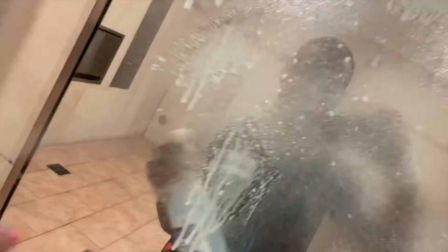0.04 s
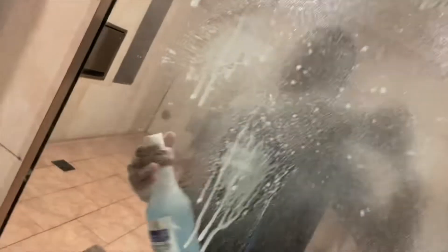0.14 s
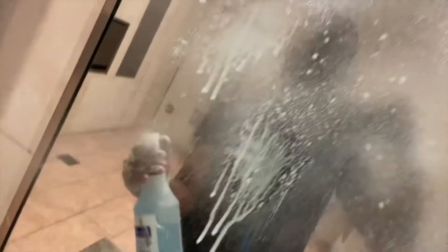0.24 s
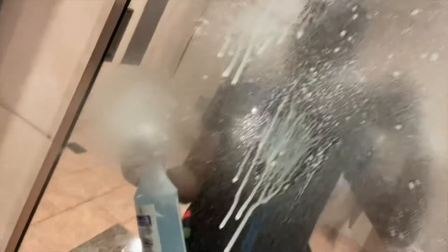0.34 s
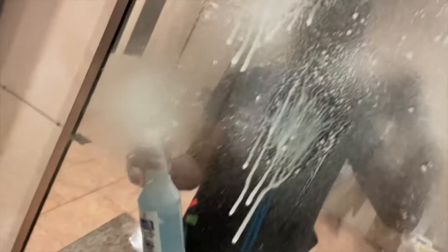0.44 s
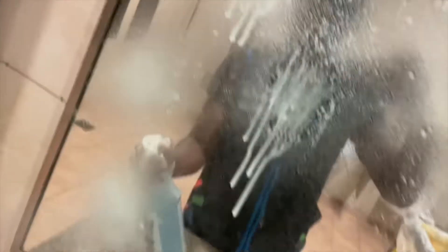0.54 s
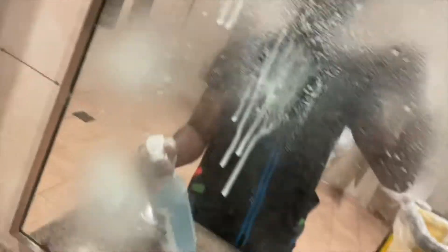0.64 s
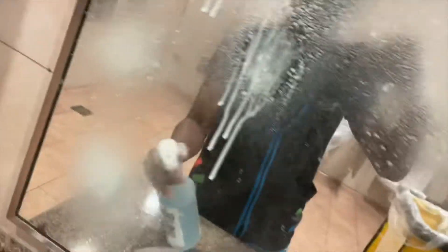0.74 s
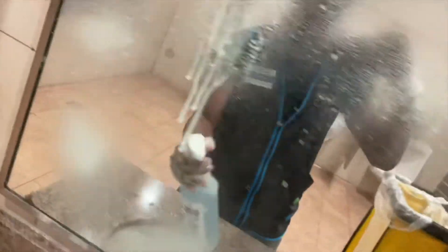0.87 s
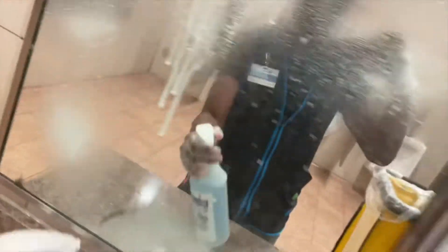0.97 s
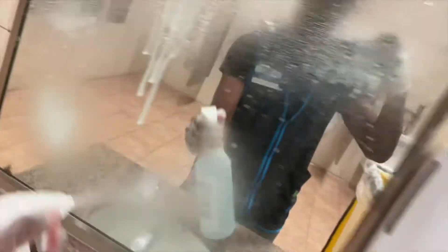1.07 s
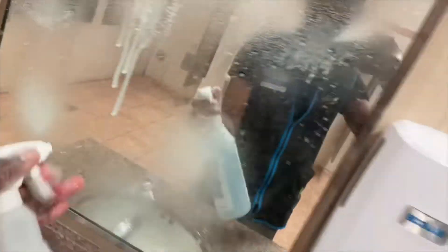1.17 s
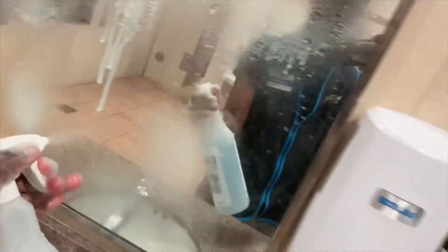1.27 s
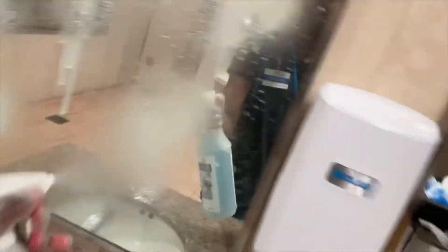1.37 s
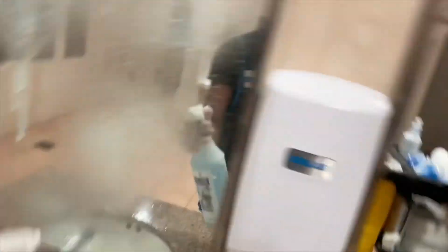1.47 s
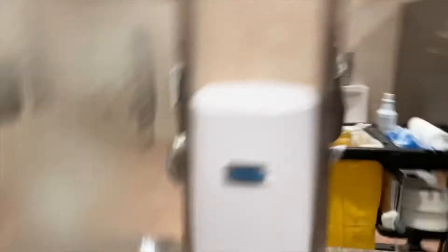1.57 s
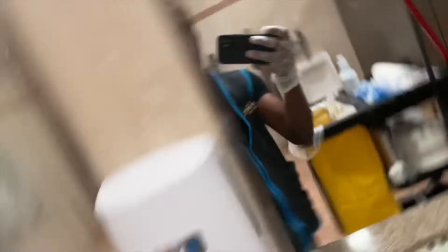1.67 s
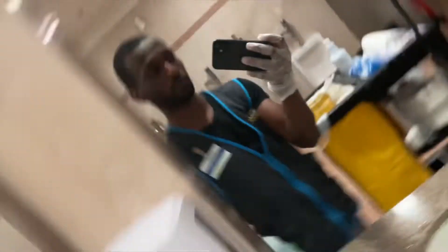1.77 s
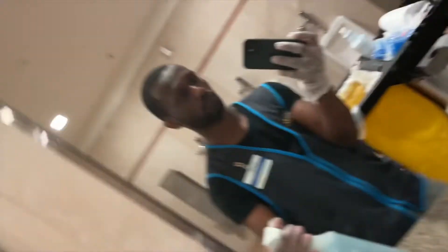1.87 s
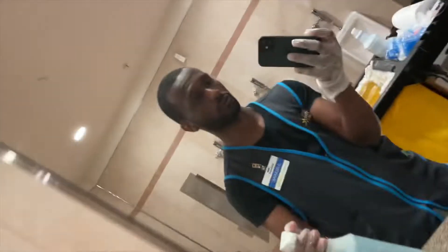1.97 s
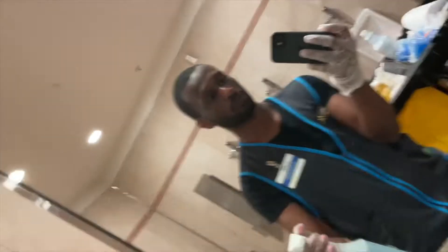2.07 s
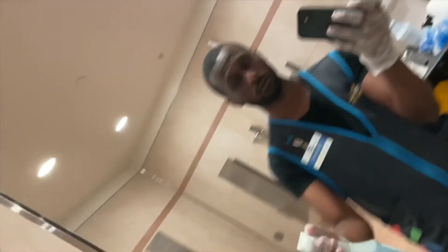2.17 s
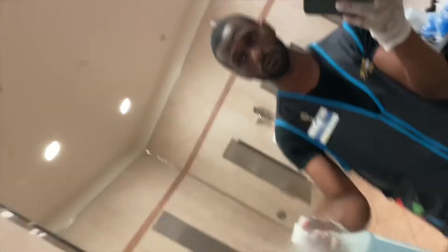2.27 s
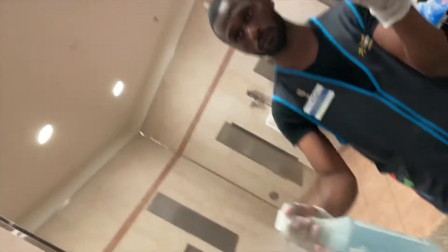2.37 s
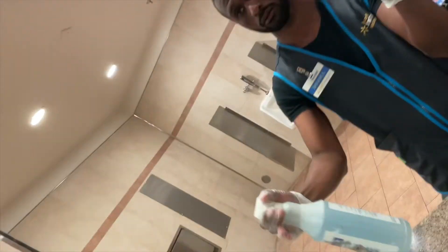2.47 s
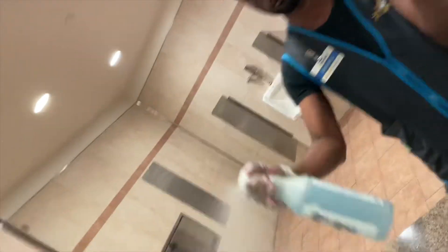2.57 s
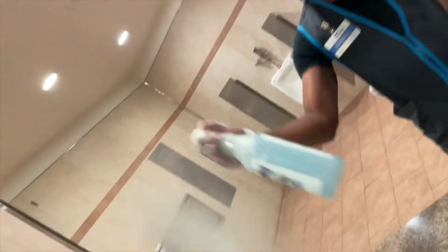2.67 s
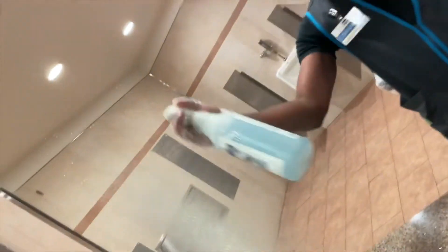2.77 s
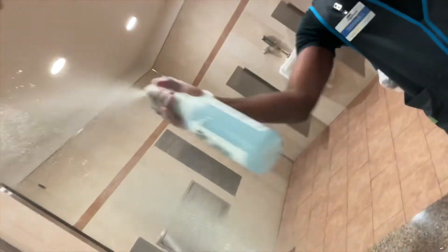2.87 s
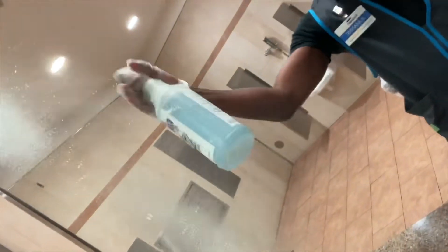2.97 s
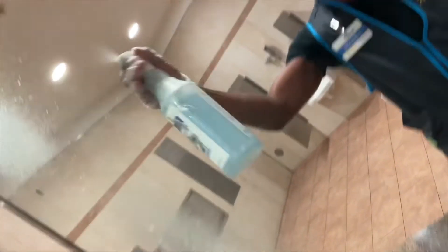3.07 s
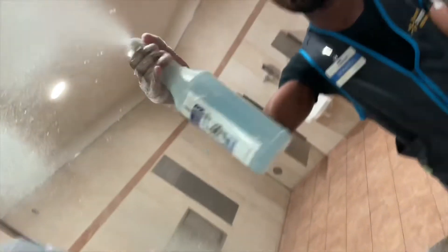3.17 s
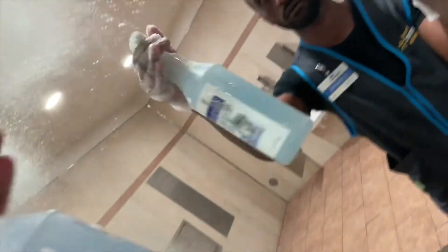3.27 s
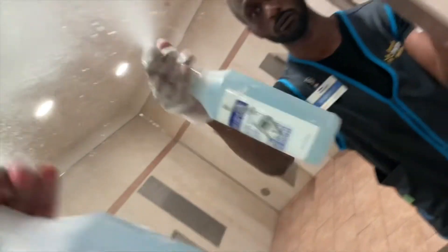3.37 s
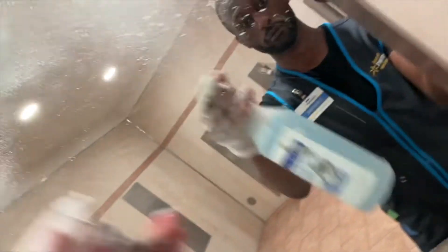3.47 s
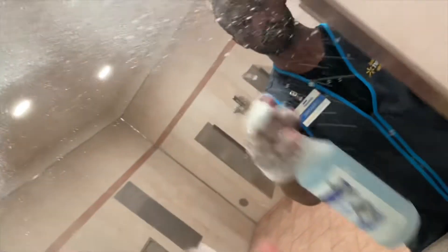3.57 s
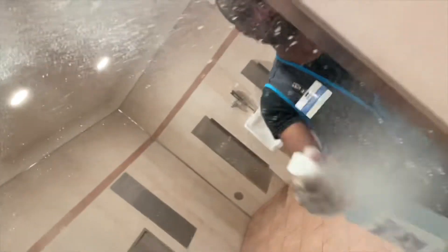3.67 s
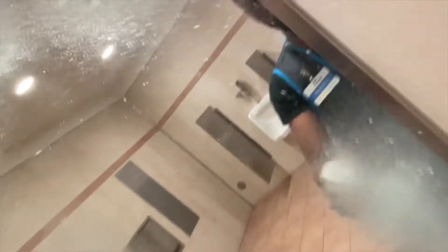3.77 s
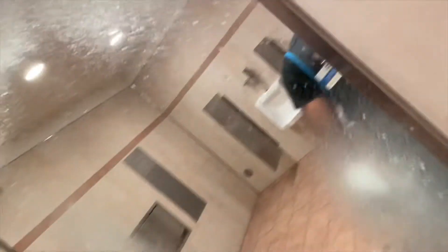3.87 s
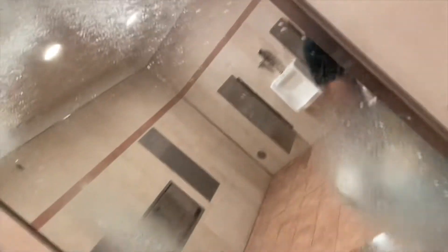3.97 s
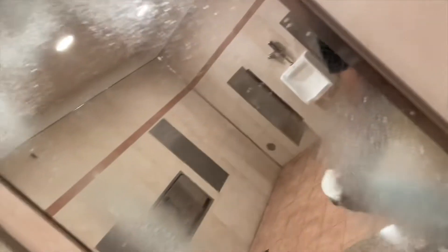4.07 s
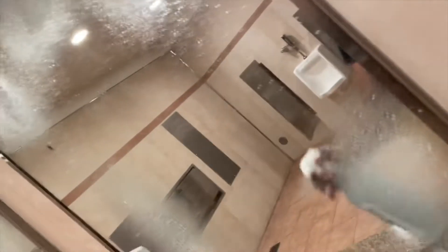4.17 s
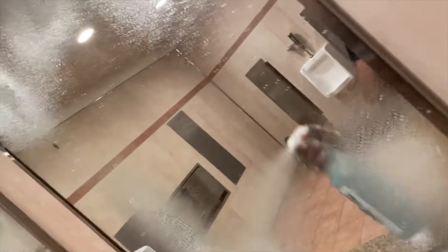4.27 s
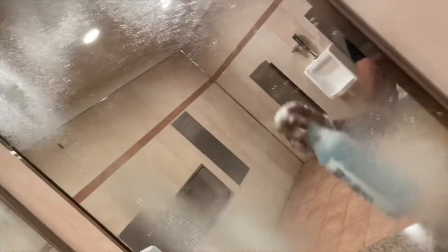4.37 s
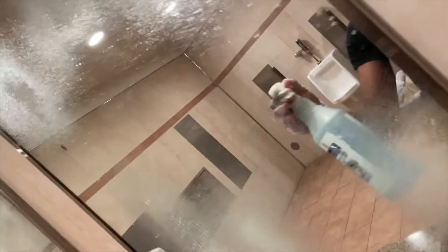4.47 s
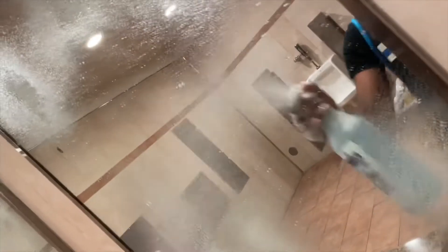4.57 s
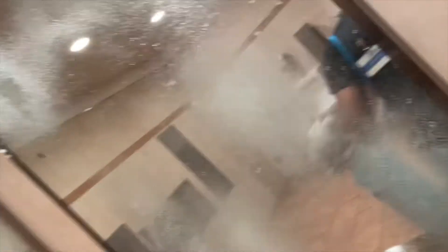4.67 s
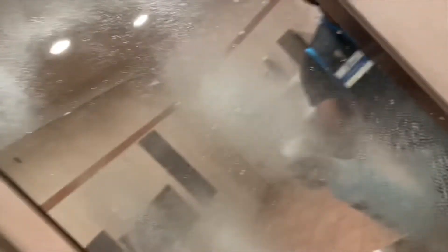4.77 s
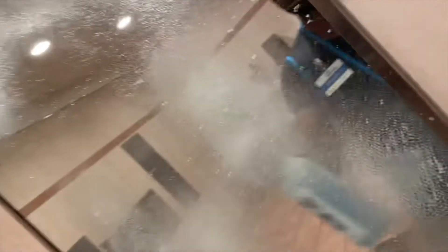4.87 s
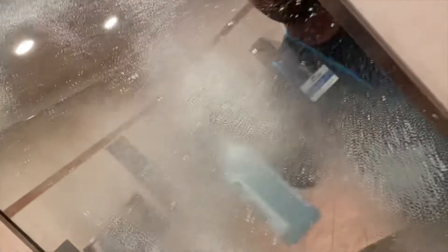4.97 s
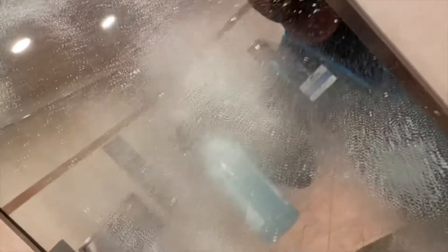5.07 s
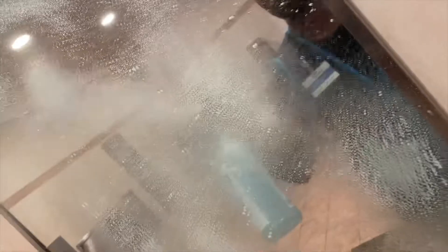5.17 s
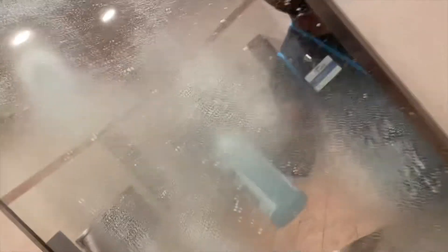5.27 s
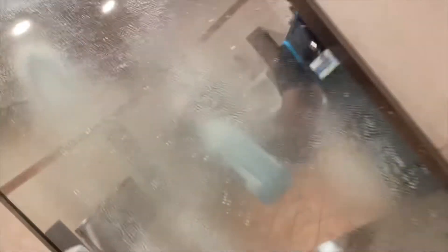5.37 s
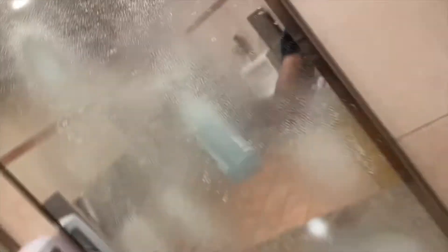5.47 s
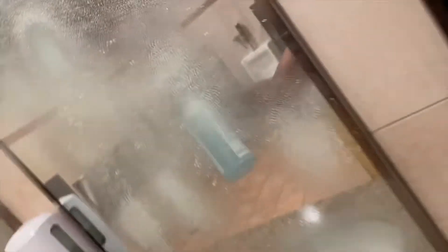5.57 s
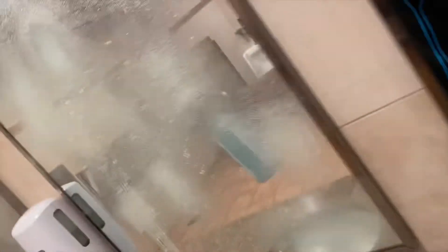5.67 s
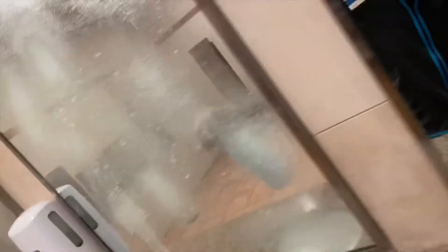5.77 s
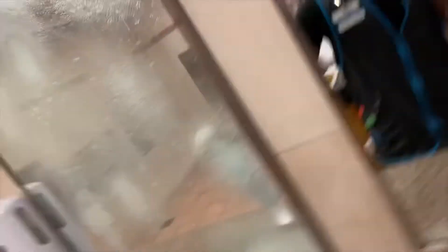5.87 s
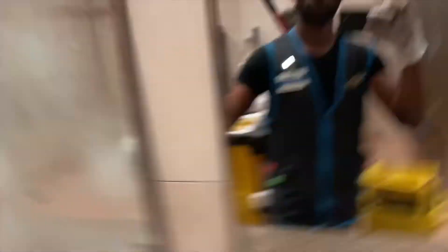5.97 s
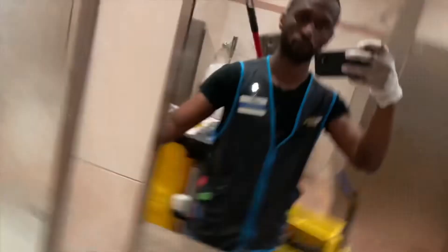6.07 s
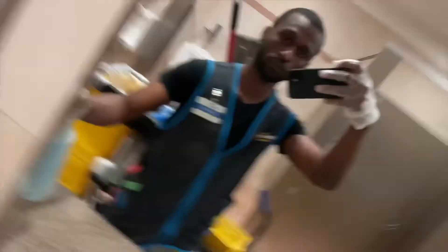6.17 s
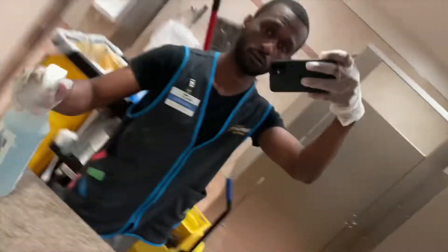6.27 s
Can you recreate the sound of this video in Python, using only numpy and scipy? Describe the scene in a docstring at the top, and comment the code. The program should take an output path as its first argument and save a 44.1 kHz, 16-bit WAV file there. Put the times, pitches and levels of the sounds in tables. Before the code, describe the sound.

A plastic trigger bottle is pumped quickly close to the microphone: each squeeze spits coarse drops, blooms into fine high mist and sputters shut, its head ringing hollowly. Low bumps come early. After six squirts there is a gap of rubbing cloth, then a steadier run to the end, with dry clicks and knocks between squeezes, short bright tile echoes, faint fan tones and handling rumble.

```python
"""A wet hiss of spray comes first, with low thuds close behind as the hand bumps the camera. A trigger bottle
squirts cleaner at a mirror in a tiled restroom, in two quick runs: each squeeze builds pressure, so shaped
noise spits, opens into fine bright mist and sputters shut, and the plastic head rings. Short ringing ticks come
from the trigger, swelling noise is the rustle of glove and sleeve, and a faint whistle and squeak are heard.
Below lie a low noise rumble, soft room air and a fan's steady tones."""
import sys
import numpy as np
from scipy import signal
from scipy.fft import rfft, irfft, next_fast_len
from scipy.io import wavfile
from scipy.ndimage import uniform_filter1d, map_coordinates

SR = 44100
rng = np.random.default_rng(int(sys.argv[2]) if len(sys.argv) > 2 else 0)


def wav_record(signal):
    """Record a signal, one row per channel, as 16-bit PCM in the file named by sys.argv[1]."""
    frames = np.transpose(np.atleast_2d(signal))
    bounded = np.clip(frames, -1, 1)
    # unit amplitude maps onto the largest positive 16-bit level
    quanta = np.round(bounded * 32767).astype(np.int16)
    wavfile.write(sys.argv[1], SR, quanta)


N = 279153
T = np.arange(N) / SR
HZ = np.fft.rfftfreq(N, 1 / SR)

# One squeeze per row: start t/s, push length t/s, level/dB, brightness level/dB, head ring level/dB,
# head ring f/Hz, nozzle whistle level/dB, opening t/s, change through the push level/dB, run-out t/s
SQUIRTS = [(0, .052, -30.5, -3.5, -14.5, 1060, -18, .002, 1, 0.021),
           (0.167, .12, -31, -4.5, -16.5, 1030, -40, .006, -1.5, 0.026),
           (.431, .14, -28, -0.5, -21.5, 1102, -26, .005, 0, .028),
           (.711, 0.13, -29.5, -1, -22.5, 1073, -18.5, .008, -3, 0.029),
           (.965, 0.14, -30, 0, -22.5, 1013, -20.5, .007, -3.5, 0.026),
           (1.235, .14, -32, -3, -21.5, 1013, -17, .009, -4, 0.026),
           (2.153, .16, -30, -1.5, -17, 1075, -21.5, .01, -.5, 0.034),
           (2.473, .14, -31, -1.2, -16.5, 1067, -29, .006, 1.5, 0.019),
           (2.757, .15, -31.5, -1, -20, 1132, -23, .004, -1, 0.026),
           (3.032, .14, -30, -1.7, -20, 1150, -27, .005, 0, 0.031),
           (3.291, 0.11, -29, -2.5, -21.5, 1175, -18, .006, 3.5, 0.036),
           (3.577, .14, -28, -3, -20.5, 1152, -19.5, .005, -1, .031),
           (3.87, .15, -29, -.5, -20.5, 1154, -20, .005, 0.5, 0.02),
           (4.153, .15, -30, -1, -19, 1090, -26, .008, -1.5, 0.022),
           (4.462, 0.15, -30, -2, -18, 1025, -18, .008, 2.5, 0.033),
           (4.775, .13, -30.5, -2, -14, 1054, -24, .008, -1, 0.022),
           (5.07, .16, -32.5, -3.5, -15.5, 1035, -28, .004, -0.5, 0.021),
           (5.412, 0.2, -33.5, -4, -19.5, 1086, -24, .008, 0, 0.024),
           (5.795, .18, -33, -1.5, -19.5, 1076, -29, .006, 0.5, 0.026),
           (6.201, 0.23, -28.5, 1.5, -25, 1057, -21.5, .003, 5.5, 0.023)]
# Colour of the coarse drops, present at any pressure: f/Hz, relative level/dB per Hz
COARSE_COLOUR = [(300, -49), (1700, -18), (2300, -12.5), (2900, -5.5), (3600, -3.5), (4700, -0.5),
                 (6200, 3), (8500, 8.5), (10500, 7), (13000, 4), (16000, -17)]
# Colour of the fine mist, heard near full pressure: f/Hz, relative level/dB per Hz
MIST_COLOUR = [(2000, -40), (5000, -19), (7000, -12.5), (9000, -9.5), (11000, -7.5), (13000, -3.3),
               (14800, -1), (15700, 1)]


def spray():
    """Each squeeze drives coarse spit, then mist, then spit again; the flow also rings the nozzle head."""
    out, t = np.zeros((2, N)), T[:SR // 3]
    coarse, fine = noise(COARSE_COLOUR), noise(MIST_COLOUR)
    for start, push, db, bright_db, ring_db, ring_hz, whistle_db, opening, swell_db, run_out in SQUIRTS:
        now = (round(start * SR) + np.arange(len(t))) % N
        p = pressure(t, push, opening, run_out)
        effort = amp(db + swell_db * (np.minimum(t / push, 1) - .5))
        hiss = jet(t, p, push, bright_db, coarse[:, now], fine[:, now])
        head = nozzle_head(t, p, ring_db, ring_hz, whistle_db)
        add(out, start, effort * (near_echoes(hiss) + head))
    # the jet tears unevenly into drops
    drops = unit(amp(1.3 * flutter(per_s=2200)))
    return uneven_colour(out) * drops


def pressure(t, push, rise, run_out, shut_s=0.0023):
    """The valve opens, pressure holds, sags as the piston stops, and the valve shuts."""
    opening = np.minimum(t / rise, 1)
    # a softened corner: nearly no sag until just before the push ends, then a steady fade
    past_push = np.logaddexp(0, (t - push + 0.013) / 0.0041)
    sagging = np.exp(-past_push * 0.011 / 0.072)
    shutting = np.exp(-np.maximum(t - push - run_out, 0) / shut_s)
    return opening * sagging * shutting


def jet(t, p, push, bright_db, coarse, fine):
    """High pressure breaks liquid into fine mist; low pressure leaves coarse drops and an unbroken jet."""
    bloom_s, breakup_share = .016, 0.56
    atomised = p ** 3 * (1 - np.exp(-t / bloom_s))
    spit = amp(-4 - bright_db) * p * (1 - breakup_share * atomised) * coarse
    mist = amp(1.5 + 0.28 * bright_db) * atomised * fine
    # the unbroken jet hisses higher the faster it runs: a chirp up at the start, down at the end
    slow_hz, fast_hz = 6000, 12500
    chirp = gliding_band(slow_hz + (fast_hz - slow_hz) * atomised, width_hz=1030)
    spurt_db = np.where(t < push / 2, -7, -9)
    spurt = amp(spurt_db) * p * (1 - atomised) * chirp
    # the hollow cone of mist hisses in a broad band that sinks by 13000 Hz per second
    cone = amp(-14.5) * atomised * gliding_band(11530 - 13000 * t, width_hz=3000)
    return spit + mist + cone + spurt


def nozzle_head(t, p, ring_db, ring_hz, whistle_db):
    """Rushing liquid makes the plastic head ring at several pitches and the nozzle whistle."""
    flow = rng.standard_normal((2, len(t)))
    main_ring = unit(resonate(flow, ring_hz, width_hz=243))
    second_mode = amp(-10) * gliding_band(np.full(len(t), 1.28 * ring_hz), width_hz=220)
    overtone = amp(-12) * unit(resonate(flow, 2 * ring_hz, width_hz=400))
    ring = amp(ring_db - 1) * (main_ring + second_mode + overtone)
    whistle = amp(whistle_db) * unit(resonate(flow, 3900, width_hz=490))
    build_up = 1 - np.exp(-t / 0.014)
    return (ring + whistle) * p * build_up


# Hand, bottle and mirror throw the hiss back: typical delay t/s, gain (plain factor)
NEAR_ECHOES = [(.0008, .42), (.0015, .36), (.0026, .34), (.0041, .28)]


def near_echoes(x):
    """Short echoes comb the hiss; longer paths slide the comb down as the bottle sweeps along the glass."""
    t, out = T[:x.shape[1]], x.copy()
    for delay, gain in NEAR_ECHOES:
        stretch = 1 + rng.uniform(.1, .7) * t
        path = delay * rng.uniform(.85, 1.2) * stretch
        at = np.maximum((t - path) * SR, 0)
        out += gain * np.array([map_coordinates(side, [at], order=3) for side in x])
    return out


def uneven_colour(x, patchy_db=3.0, size=512):
    """Narrow bands of the hiss flare and fade at random within hundredths of a second."""
    overlap = 3 * size // 4
    z = signal.stft(x, nperseg=size, noverlap=overlap)[2]
    patches = rng.standard_normal(z.shape[1:])
    # smooth across neighbouring pitches, then across time
    patches = uniform_filter1d(patches, size=4, axis=0)
    patches = unit(uniform_filter1d(patches, size=7, axis=1))
    flaring = z * unit(amp(patchy_db * patches))
    return signal.istft(flaring, nperseg=size, noverlap=overlap)[1][:, :N]


# Slugs of liquid that spit as the valve opens or shuts: t/s, level/dB, f/Hz, length t/s
SLUGS = [(0.01, -38, 12000, 0.016), (0.177, -29, 9580, 0.017), (0.436, -33.5, 10500, 0.022),
         (0.573, -39, 6250, 0.033), (0.711, -42, 6950, 0.022), (0.717, -33.5, 11000, 0.017),
         (0.969, -46, 7700, 0.014), (2.165, -37, 8500, 0.023), (2.763, -39, 10300, 0.022),
         (3.031, -32.5, 6500, 0.011), (3.414, -38.5, 5540, 0.033), (3.571, -34, 6600, 0.019),
         (4.018, -43.5, 5700, 0.029), (4.913, -41.5, 5920, 0.024), (5.077, -43, 6530, 0.02),
         (5.799, -45, 5800, 0.021)]


def slugs(width_hz=1700):
    """Each slug of liquid is a short wet burst of noise in a narrow band."""
    out = np.zeros((2, N))
    for s, db, hz, length in SLUGS:
        size = max(round(length * SR), 64)
        burst = gliding_band(np.full(size, hz), width_hz)
        add(out, s, amp(db) * burst * signal.windows.tukey(size, .8))
    return out


# Ticks as the trigger springs back and is taken up again:
# lead before the squeeze t/s, average drive level/dB, ring f/Hz, width f/Hz, rattle fade by 60 dB t/s
TRIGGER_TICKS = [(.048, -57, 2300, 2400, .04), (.014, -53.5, 1130, 600, .045)]
# Further louder ticks and short rattles of the trigger, at set times: # t/s, drive level/dB, ring f/Hz, width
# f/Hz, rattle fade by 60 dB t/s
KNOCKS = [(2.122, -49, 1075, 397, .049), (2.134, -48, 2170, 1820, 0.092), (2.456, -56, 2200, 1500, .04),
          (2.707, -42, 2180, 1800, 0.053), (2.987, -46, 2400, 1300, .03), (3.2702, -47, 2300, 1980, 0.044),
          (3.526, -46, 2280, 1400, 0.027), (3.567, -40, 1370, 900, .035), (3.824, -48, 2400, 1300, .055),
          (4.143, -52, 1100, 500, 0.031), (4.45, -43, 1150, 595, 0.028), (4.649, -46, 1920, 330, 0.026),
          (4.668, -48, 2190, 900, 0.046), (4.691, -41, 2100, 1900, 0.088), (4.696, -39, 1390, 900, 0.022),
          (4.701, -48, 2220, 1910, 0.082), (4.7083, -37.5, 2300, 2400, 0.043), (4.76, -56, 1100, 600, .03),
          (5.011, -50, 2170, 990, 0.042), (5.0497, -46, 1200, 900, .036)]


def trigger(spread_db=2):
    """Plastic trigger ticks lead into every squeeze but the first; at set times the trigger ticks louder or
    rattles."""
    out = np.zeros((2, N))
    for start, *_ in SQUIRTS[1:]:
        for ahead, db, *ring in TRIGGER_TICKS:
            varied_db = db + spread_db * rng.standard_normal()
            add(out, start - ahead, amp(varied_db) * tick(*ring))
    for s, db, *ring in KNOCKS:
        add(out, s, amp(db) * tick(*ring))
    return out


def tick(hz, width_hz, t60):
    """Plastic strikes plastic and chatters: a hollow knock in a narrow band, a dry click in a wide one."""
    t = T[:SR // 6]
    strike = amp(4.5) * np.sin(2 * np.pi * hz * t) * np.exp(-0.67 * width_hz * t)
    chatter = amp(1.0 * flutter(per_s=760)[:len(t)])
    rattle = unit(resonate(rng.standard_normal((2, len(t))) * chatter, hz, width_hz))
    fade = amp(-60 * t / t60) * np.minimum(t / 0.0016, 1)
    return strike + amp(-2.5) * rattle * fade


# Bumps of the hand on the camera: t/s, level/dB before the shared lift, f/Hz, fade by 60 dB t/s
BUMPS = [(0.082, -27, 422, 0.013), (0.083, -26.5, 233, 0.084), (0.084, -20, 99.4, 0.11),
         (0.122, -29.5, 80, 0.11), (0.1, -32, 260, 0.07), (0.101, -28.5, 129.6, 0.17), (0.18, -23, 95, 0.1),
         (0.2, -29.5, 112, 0.13), (0.231, -25, 88, 0.06)]


def bumps(rise_s=0.002, lift_db=2.0):
    """Bumps shake the camera body: soft, low, fading tones, alike on both sides."""
    out, t = np.zeros(N), T[:SR // 4]
    for s, db, hz, t60 in BUMPS:
        onset = 1 - np.exp(-t / rise_s)
        add(out, s, amp(db + lift_db - 60 * t / t60) * onset * -np.sin(2 * np.pi * hz * t))
    return out


# Rustle of the sleeve as the arm sweeps along the mirror: t/s, level/dB before the shared lift
SLEEVE = [(0.0, -54.5), (0.81, -57), (1.45, -53.5), (1.62, -50.5), (1.74, -59), (2.03, -67.5),
          (2.52, -52.5), (2.78, -49.5), (3.14, -57.5), (3.65, -53), (3.84, -56), (4.02, -52.5),
          (4.25, -51.5), (4.76, -57.5), (4.97, -54.5), (5.04, -56.5), (5.22, -57), (5.34, -61), (5.5, -57),
          (5.72, -56), (6.1, -49.5), (6.33, -57)]
# Colour of the cloth: f/Hz, relative level/dB per Hz
CLOTH = [(400, 5), (900, 0), (1600, 2), (2400, 2.5), (3500, 4), (6000, -0.5), (12000, -21.5)]


def rustle(lift_db=3.0):
    """Cloth rubs as it moves: the sleeve rests after each push, the glove swells with every squeeze."""
    grip_db, grip_s = -28.5, 0.2  # glove level against the squirt, length of its swell
    rest_db, rest_after_s, rest_width_s = -2.5, 0.085, 0.23
    sleeve_db = lift_db + np.interp(T, *np.transpose(SLEEVE))
    grip = np.zeros(N)
    for start, push, db, *_ in SQUIRTS:
        from_rest = T - start - push - rest_after_s
        sleeve_db = sleeve_db + rest_db * np.exp(-(from_rest / rest_width_s) ** 2)
        grip += amp(db + grip_db) * np.sin(np.pi * np.clip((T - start) / grip_s, 0, 1))
    grain_db = 1.07 * flutter(per_s=220)
    folds_db = 1.63 * flutter(per_s=20)
    return np.hypot(amp(sleeve_db), grip) * amp(grain_db + folds_db) * noise(CLOTH)


# Airy whistle in the pause: t/s, level/dB before the side gains
WHISTLE = [(1.3, -67), (1.42, -59), (1.58, -55), (1.8, -58.5), (2.06, -59.5), (2.16, -76)]
# Squeak near the end, sliding up and settling: t/s, f/Hz, level/dB before the side gains
SQUEAK = [(6.02, 558, -52), (6.045, 562, -48.5), (6.07, 562, -41.5), (6.1, 570, -46), (6.125, 573, -54),
          (6.174, 575, -45.5), (6.22, 576, -55), (6.256, 557, -51), (6.285, 565, -70)]
# Partials of the squeak: multiple of its pitch, relative level/dB
SQUEAK_PARTIALS = [(1, 0), (2, -19), (4, -17)]


def tones(waver_hz=9, rough_db=-1.0, rub_db=-14):
    """Mostly on the right: narrow noise whistles in the pause; sliding tones and noise squeak near the end."""
    airy = unit(resonate(rng.standard_normal(N), 1775, width_hz=270))
    whistle = amp(np.interp(T, *np.transpose(WHISTLE), left=-np.inf, right=-np.inf)) * airy
    s, hz, db = np.transpose(SQUEAK)
    # adding up the pitch gives the number of turns so far
    turns = np.cumsum(np.interp(T, s, hz) + waver_hz * flutter(per_s=42)) / SR
    squeak = sum(amp(part_db) * np.sin(2 * np.pi * k * turns) for k, part_db in SQUEAK_PARTIALS)
    rub = amp(rub_db) * unit(resonate(rng.standard_normal(N), hz.mean(), width_hz=85))
    squeak_db = np.interp(T, s, db, left=-np.inf, right=-np.inf) + rough_db * flutter(per_s=100)
    side_gains = np.array([[.3], [1.2]])  # left, right
    return (whistle + (squeak + rub) * amp(squeak_db)) * side_gains


# Decay of the tiled room: f/Hz, fade by 60 dB t/s
ROOM_T60 = [(200, .9), (1000, .95), (4000, 1.0), (8000, .9), (12000, .68), (16000, .52)]


def echoes(early_t60=0.16):
    """Hard tiles: quick reflections from the mirror corner, then a long bright tail."""
    t_room = T[:SR]
    signs = rng.choice([-1., 1.], (2, SR))
    chosen = rng.random((2, SR)) < 4000 / SR  # about 4000 reflections per second
    taps = signs * chosen * (t_room > .004)
    hz, t, z = signal.stft(taps, SR, nperseg=256)
    decay = amp(-60 * t / read(ROOM_T60, hz)[:, None])
    tail = signal.istft(z * decay, SR, nperseg=256)[1][:, :SR]
    early = taps * amp(-60 * t_room / early_t60)
    return amp(-15) * tail / np.linalg.norm(tail[0]) + amp(-13) * early / np.linalg.norm(early[0])


def room(x, count=5):
    """The bottle moves between squirts, so neighbouring squirts meet different echoes."""
    starts = [row[0] for row in SQUIRTS]
    place = np.searchsorted(starts, T, "right") % count
    echoed = [signal.fftconvolve(x * (place == k), echoes(), axes=1)[:, :N] for k in range(count)]
    return x + sum(echoed)


# Colour of the low rumble: f/Hz, relative level/dB per Hz
RUMBLE = [(20, -49), (36, -26), (50, 1.5), (62, 1), (80, -6), (120, 2), (173, -12), (263, -17.5),
          (320, -21), (500, -23.5), (700, -29.5), (1200, -90)]
# Colour of the still room air: f/Hz, relative level/dB per Hz
AIR = [(200, 18), (450, -0.5), (1100, 13.5), (1600, 1), (3000, -16), (6000, -19), (12000, -28.5)]
# Lulls and swells of the rumble: t/s, width t/s, change of deep part level/dB, of upper part level/dB
LULLS = [(.71, 0.18, -13, -11.5), (3.3, 0.068, -6, -2.5), (4.65, 0.3, 0, 0), (5.55, 0.092, 1, 1.5),
         (5.8, 0.066, -4, -7.5), (6.04, 0.093, -17, 1.5), (6.29, .08, -12, 0.5)]


def background(rumble_db=-45.5, air_db=-58, split_hz=90):
    """Low rumble, probably from handling the camera, its deep and upper parts dipping and swelling; room air."""
    deep_db, upper_db = np.zeros(N), np.zeros(N)
    for s, width, deep_change_db, upper_change_db in LULLS:
        shape = np.exp(-((T - s) / width) ** 2)
        deep_db += deep_change_db * shape
        upper_db += upper_change_db * shape
    rumble = noise(RUMBLE)
    deep = signal.sosfiltfilt(signal.butter(4, split_hz, fs=SR, output="sos"), rumble)
    upper = rumble - deep
    return amp(rumble_db + deep_db) * deep + amp(rumble_db + upper_db) * upper + amp(air_db) * noise(AIR)


# Steady hum of the fan: f/Hz, rms level/dB
HUM = [(58.5, -59), (129, -64), (163.5, -61), (246, -70), (674, -74), (1068, -73.5)]


def hum(waver_rad=0.62):
    """The fan hums in faint steady tones that drift a little in phase."""
    out = np.zeros(N)
    for hz, db in HUM:
        phase = 2 * np.pi * hz * T + waver_rad * flutter(per_s=5)
        out += amp(db) * np.sqrt(2) * np.sin(phase)
    return out


# How alike the two microphone ports are: f/Hz, likeness from 0 to 1
LIKENESS = [(60, .92), (180, .85), (400, .6), (700, .45), (1000, .78), (1700, .25), (2300, .75),
            (3400, .35), (4400, .82), (5700, .25), (7100, .98), (7900, .98), (9000, .6), (10300, .99),
            (11600, .99), (12700, .55), (14000, .99), (15200, .99), (15800, .75)]
# How far the left port leads: f/Hz, phase/rad
LEAD = [(200, 0), (1400, 1), (2000, 0), (3400, .5), (5200, 0), (6800, -np.pi), (8000, -np.pi), (9400, -5),
        (10000, -2 * np.pi), (11700, -2 * np.pi), (13800, -3 * np.pi), (15200, -3 * np.pi), (16000, -9.8)]


def ports(x):
    """Blends two unrelated signals into a microphone pair; likeness and phase change with frequency."""
    a, b = rfft(x)
    same = read(LIKENESS, HZ)
    blend = same * a + np.sqrt(1 - same ** 2) * b
    right = blend * np.exp(-1j * read(LEAD, HZ))
    return irfft(np.array([a, right]), N)


def amp(db):
    """Turns decibels into a gain."""
    return 10 ** (np.asarray(db) / 20)


def unit(x):
    """Scales to an rms (average strength) of 1."""
    return x / np.sqrt(np.mean(x ** 2) + 1e-20)


def read(points, hz):
    """Reads a table between its points, on a logarithmic frequency axis."""
    f, value = np.transpose(points)
    return np.interp(np.log(hz + 1), np.log(f + 1), value)


def add(mix, s, sound):
    """Mixes a sound in at time s, in seconds."""
    part = mix[..., max(round(s * SR), 0):][..., :sound.shape[-1]]
    part += sound[..., :part.shape[-1]]


def noise(spectrum):
    """Two unrelated noises of one colour, rms 1."""
    size = next_fast_len(N, real=True)
    gain = amp(read(spectrum, np.fft.rfftfreq(size, 1 / SR)))
    white = rng.standard_normal((2, size))
    return unit(irfft(rfft(white) * gain, size)[:, :N])


def gliding_band(hz, width_hz):
    """Two noises of rms 1 in a band that follows the curve hz."""
    shape = (2, len(hz))
    hiss = rng.standard_normal(shape) + 1j * rng.standard_normal(shape)
    narrow = signal.sosfilt(signal.butter(2, width_hz / 2, fs=SR, output="sos"), hiss)
    # turning the low noise around at hz moves it up to that pitch
    return unit((narrow * np.exp(2j * np.pi * np.cumsum(hz) / SR)).real)


def resonate(x, hz, width_hz):
    """A steep resonance: the same two-pole filter applied twice."""
    b, a = signal.iirpeak(hz, hz / width_hz, fs=SR)
    return signal.lfilter(b, a, signal.lfilter(b, a, x))


def flutter(per_s):
    """A random wobble of rms 1, with per_s new values a second joined by straight lines."""
    knots = rng.standard_normal(20000)
    return unit(np.interp(T * per_s, np.arange(len(knots)), knots))


def scene():
    """The bottle in the room, with the handling sounds, over the background."""
    bottle = room(spray() + slugs() + trigger())
    return ports(bottle + rustle() + background()) + hum() + bumps() + tones()


def record(dry):
    """The microphone's bass roll-off below 36 Hz, then the band limit at 16000 Hz."""
    lean = signal.sosfilt(signal.butter(4, 36, "highpass", fs=SR, output="sos"), dry)
    band_limit = signal.firwin(511, 16000, window=("kaiser", 9), fs=SR)
    return signal.oaconvolve(lean, band_limit[None], "same")


dry = scene()
out = record(dry)
wav_record(out)
```